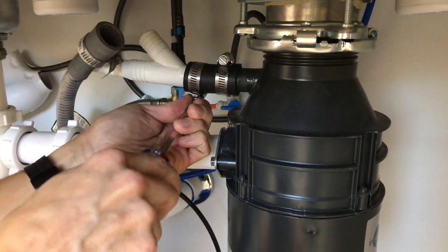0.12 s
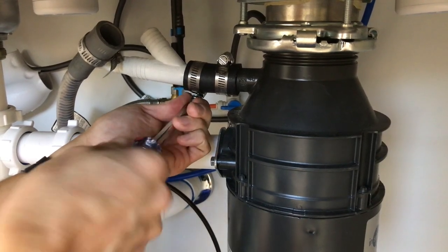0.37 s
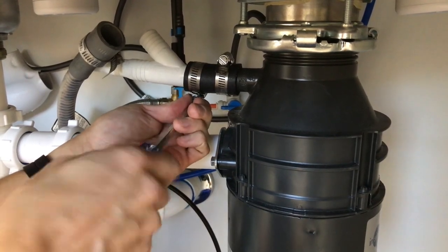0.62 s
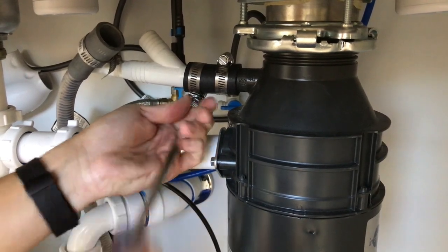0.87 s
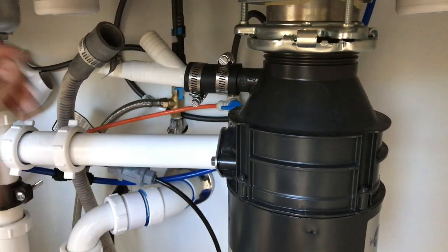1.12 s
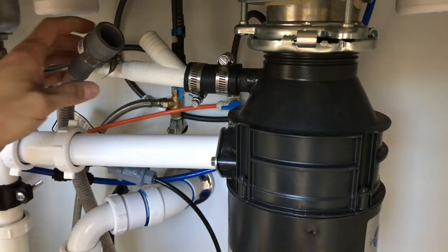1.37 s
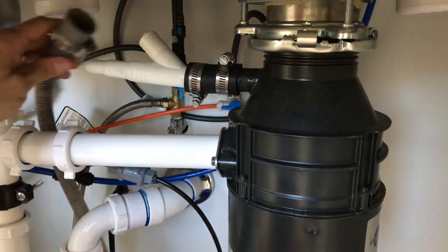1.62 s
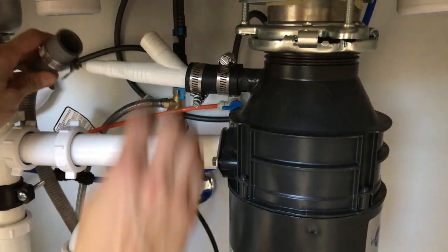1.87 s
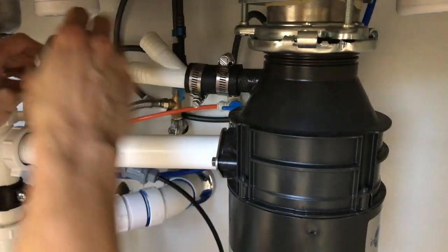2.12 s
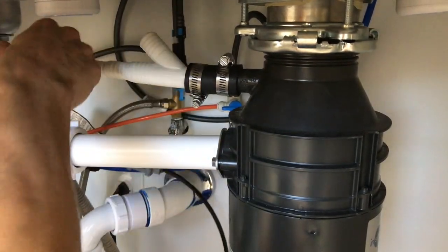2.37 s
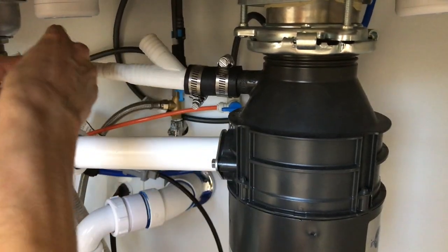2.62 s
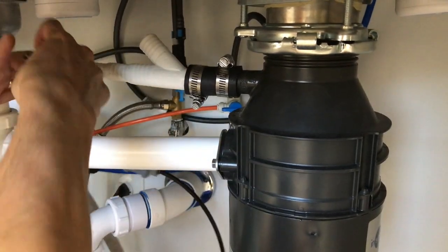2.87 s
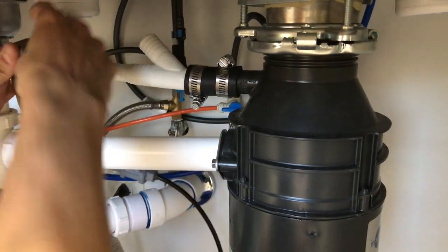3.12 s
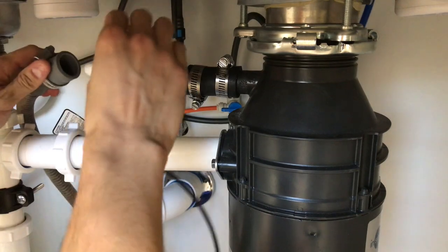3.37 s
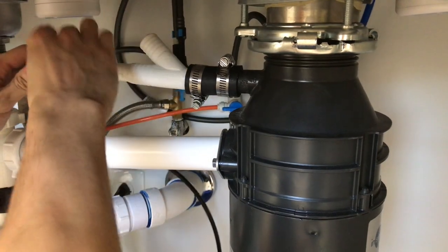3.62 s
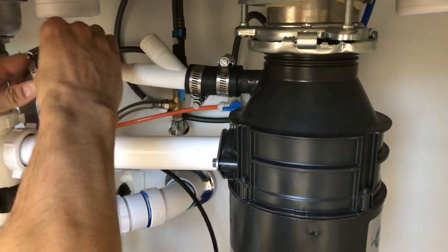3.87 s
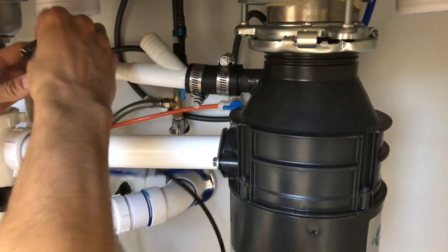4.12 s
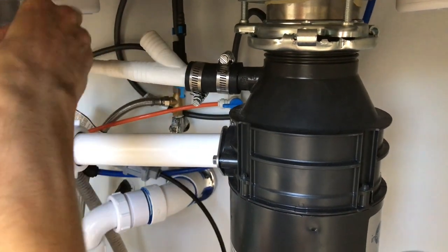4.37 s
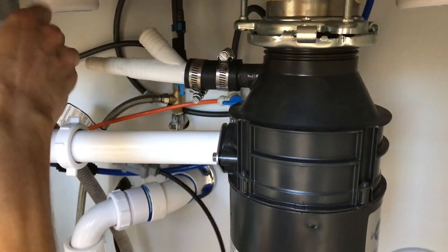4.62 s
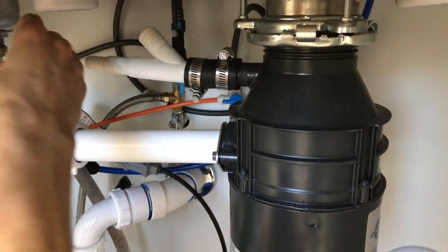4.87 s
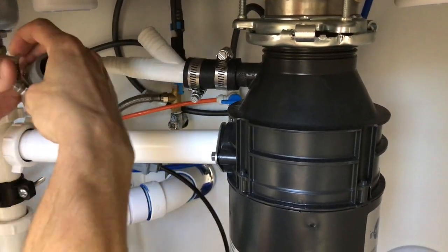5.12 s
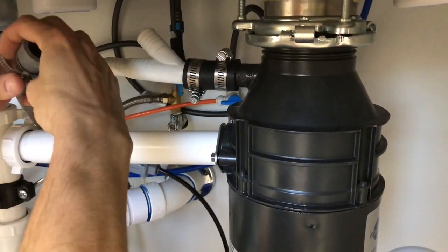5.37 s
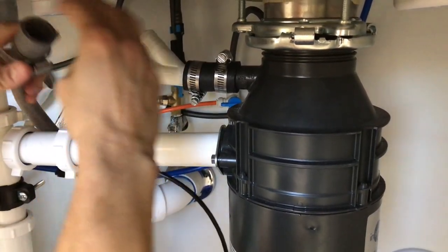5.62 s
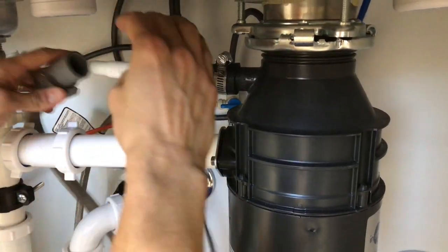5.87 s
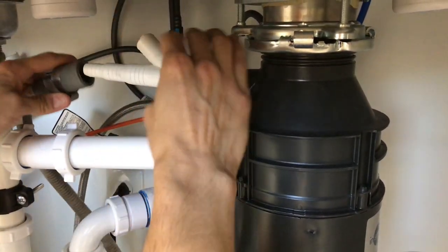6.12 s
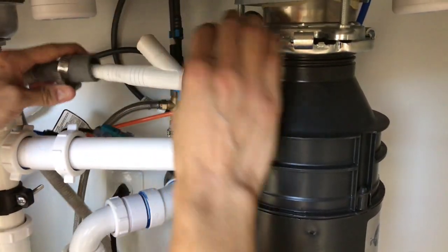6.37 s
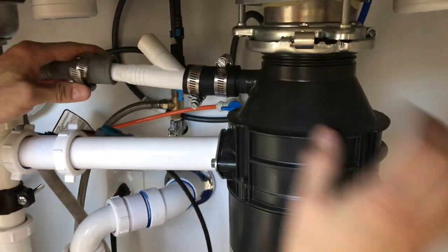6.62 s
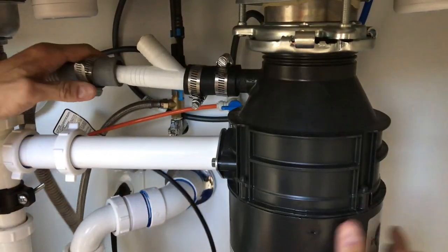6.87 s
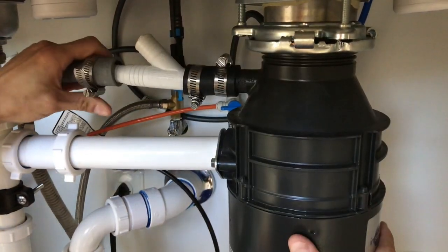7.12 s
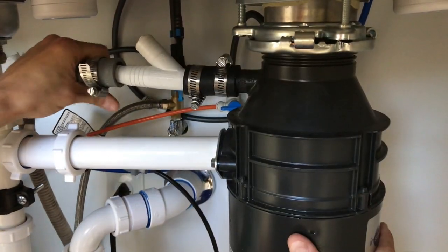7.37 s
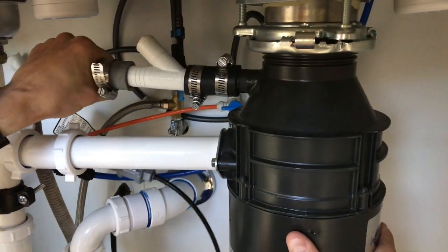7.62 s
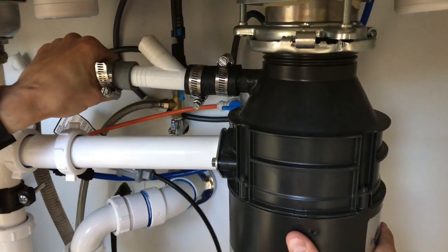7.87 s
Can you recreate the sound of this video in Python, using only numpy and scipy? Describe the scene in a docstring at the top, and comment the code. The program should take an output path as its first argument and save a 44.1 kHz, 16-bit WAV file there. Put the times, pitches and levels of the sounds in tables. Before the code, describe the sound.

A steady, soft low hum and barely audible hiss fill a small, boxy sink cabinet, miked close. At 0 s a screwdriver slips on a hose clamp with a crisp click, followed by faint rubbing and thin, fuzzy metal whistles until 0.7 s, with a dull knock near 0.55. It is almost quiet from 1 to 1.7 s. Around 1.75-1.95 a rapid cluster of hollow plastic knocks thumps the pipes, then light scrapes. Separate knocks fall near 3.0, 3.4, 4.3 and 4.6 s, with a tiny squeak near 4.8. From 5.2 s handling thickens: rubber rasps, small creaks around 5.5-5.7, then dense clatter and low thuds from 5.85 to 6.3. The loudest hard clack lands at 6.5, with a brief rubbery scrape after. Sparse clicks follow at 6.9, 7.13 with a short creak, and 7.7.

```python
"""Hands work inside a sink cabinet, over a low household hum that lasts throughout.
First a screwdriver slips on a hose clamp; then a ribbed plastic hose and its adapter are dragged over
the drain pipes. Each contact is a decaying burst of noise filtered by the plastic; pushes and knocks
excite the modes of pipes and cabinet; skin and ribs rub as grainy noise; rubber rasps and the rubbed
hose creaks as filtered pulse trains, and thin metal sings as noise in a gliding narrow band."""
import sys
import numpy as np
from scipy import signal
from scipy.fft import rfft, irfft
from scipy.io import wavfile
from scipy.ndimage import uniform_filter1d

SR = 44100
rng = np.random.default_rng(int(sys.argv[2]) if len(sys.argv) > 2 else 0)


def voltage_ratio(decibels):
    """Convert decibels (scalar or array-like) to amplitude ratios, 20 dB per decade."""
    exponent = np.asarray(decibels, float) / 20
    return 10 ** exponent


def wav_record(signal):
    """Record a signal, one row per channel, as 16-bit PCM in the file named by sys.argv[1]."""
    frames = np.transpose(np.atleast_2d(signal))
    bounded = np.clip(frames, -1, 1)
    # unit amplitude maps onto the largest positive 16-bit level
    quanta = np.round(bounded * 32767).astype(np.int16)
    wavfile.write(sys.argv[1], SR, quanta)


N = 352800  # samples


def evened(x):
    """Normalization: scales a signal to rms 1."""
    return x / np.sqrt(np.mean(x ** 2) + 1e-20)


def read(points, hz):
    """Interpolation of a spectrum on a log-frequency axis."""
    f, value = np.transpose(points)
    return np.interp(np.log(hz + 1), np.log(f + 1), value)


def add(mix, s, sound):
    """Superposition: adds a sound into the mix at a time in seconds."""
    part = mix[round(s * SR):][:len(sound)]
    part += sound[:len(part)]


def coloured(x, gain):
    """Linear filtering: multiplies the spectrum by a gain given as a function of frequency."""
    return irfft(rfft(x) * gain(np.fft.rfftfreq(x.shape[-1], 1 / SR)), x.shape[-1])


def ring(modes):
    """Modal superposition: impulse response of exponentially dying modes, peak 1."""
    t = np.arange(SR) / SR
    out = sum(voltage_ratio(db - 60 * t / t60) * np.sin(2 * np.pi * hz * t) for hz, db, t60 in modes)
    return out / abs(out).max()


def peak(hz, centre_hz, width_hz):
    """Resonance: gain of one damped mode, never narrower than 20 Hz."""
    return 1 / np.sqrt(1 + (2 * (hz - centre_hz) / max(width_hz, 20)) ** 2)


# Steady low hum. Each row: frequency in Hz, relative spectral level in dB per Hz.
HUM_SPECTRUM = [(15, -44), (25, -19.5), (40, -3), (68, 1), (97, -6.5), (152, -22.5), (183, -10.5),
                (269, -28), (372, -17), (396, -33.5), (507, -38.5), (1000, -54.5), (1300, -88),
                (2200, -120)]
# Faint hiss. Each row: frequency in Hz, relative spectral level in dB per Hz.
HISS_SPECTRUM = [(530, -46.5), (900, -9), (1060, -10.5), (1260, -4.5), (1510, -9), (5440, -10),
                 (15800, -18)]
HUM_DB, HISS_DB = -52.5, -83  # rms levels


def hum():
    """Stationary filtered noise: a steady low rumble of the house and a faint hiss."""
    low, high = rng.standard_normal((2, N))
    rumble = evened(coloured(low, lambda hz: voltage_ratio(read(HUM_SPECTRUM, hz))))
    hiss = evened(coloured(high, lambda hz: voltage_ratio(read(HISS_SPECTRUM, hz))))
    return voltage_ratio(HUM_DB) * rumble + voltage_ratio(HISS_DB) * hiss


# Hands shifting things. Each row: time in seconds, relative push on pipes and cabinet in dB,
# relative slide of skin and ribs in dB.
HAND_MOTION = [(0.0, -49, -69), (0.36, -57, -74), (0.73, -51, -79), (0.96, -54.5, -84.5),
               (1.54, -55.5, -78.5), (1.8, -47, -66), (1.91, -48.5, -65), (2.16, -43.5, -73.5),
               (2.47, -54.5, -76), (2.85, -53.5, -71), (3.39, -46.5, -71), (3.5, -44, -75),
               (3.74, -50.5, -72), (3.94, -56.5, -93), (4.17, -51, -75), (4.5, -46, -65.5),
               (5.03, -51.5, -76), (5.26, -44, -70), (5.39, -48, -70), (5.68, -51, -72), (5.81, -36.5, -69),
               (5.97, -36, -57.5), (6.24, -45, -68), (6.55, -40.5, -53.5), (6.66, -42, -69),
               (6.97, -51.5, -72.5), (7.46, -53.5, -81.5), (8.0, -47.5, -76.5)]


def hands(t):
    """Slowly varying excitation: push and slide of the hands at times t, in dB."""
    s, push_db, slide_db = np.transpose(HAND_MOTION)
    return np.interp(t, s, push_db), np.interp(t, s, slide_db)


# Modes of the drain pipes. Each row: frequency in Hz, relative level in dB, free decay time t60 in seconds.
PIPE_MODES = [(118.9, 0, 0.67), (187.1, -5, 0.44), (232.6, -2.5, 0.24), (253.1, -0.5, 0.2),
              (291.1, 0, 0.27), (315, 2.5, 0.24), (358, -10.5, 1), (413, -16.5, .7), (539, -26.5, 0.81),
              (562, -11.5, 0.21), (653.4, -15.5, .25), (710, -23, 0.19), (902, -35, 0.1)]
# Modes of the cabinet. Each row: frequency in Hz, relative level in dB, decay time t60 in seconds.
CABINET_MODES = [(66.3, 0.5, 0.28), (78.7, -9.5, 0.37), (100.7, -3.5, 0.11)]
CABINET_SHARE, PIPE_SHARE = 1, 1.73  # dB of shaking per dB of push
PUSH_REF_DB, CABINET_SHAKE_DB, PIPE_SHAKE_DB = -51, -55.5, -61.5  # shaking levels at the reference push
PUSH_LUMP_DB = 3.5  # the push comes in uneven bumps


def pushing():
    """Forced vibration: the lumpy push of the hands drives the modes of pipes and cabinet."""
    push_db = hands(np.arange(N) / SR)[0] - PUSH_REF_DB
    held = ring([(hz, db, min(t60, .3)) for hz, db, t60 in PIPE_MODES])  # a grip damps the pipes
    cabinet = ring(CABINET_MODES)
    noise, lumps = rng.standard_normal((2, 2, N))
    push = evened(noise * voltage_ratio(PUSH_LUMP_DB * evened(uniform_filter1d(lumps, 1500))))
    pipe_force = push[0] * voltage_ratio(PIPE_SHAKE_DB + PIPE_SHARE * push_db)
    cabinet_force = push[1] * voltage_ratio(CABINET_SHAKE_DB + CABINET_SHARE * push_db)
    pipe_shake = signal.oaconvolve(pipe_force, held / np.linalg.norm(held))[:N]
    cabinet_shake = signal.oaconvolve(cabinet_force, cabinet / np.linalg.norm(cabinet))[:N]
    return pipe_shake + cabinet_shake


# Resonances of hose, adapter and clamp. Each row: frequency in Hz, width in Hz (20 at least), gain in dB.
PLASTIC_MODES = [(760, 39, -7), (1080, 17, -40.5), (1320, 15, 2.5), (1297, 17, -18), (1700, 48, -17),
                 (1780, 36, 1), (2030, 20, -7), (2354, 36, -2.5), (3260, 410, -6.5), (4110, 110, -5),
                 (4840, 280, -11.5), (5900, 8.3, -0.5), (5650, 21, -6), (13460, 4000, 0.5)]


def plastic(hz):
    """Resonant transmission: gain of hose, adapter and clamp over a flat base."""
    return voltage_ratio(-3.0) + sum(voltage_ratio(db) * peak(hz, f, width) for f, width, db in PLASTIC_MODES)


# Sliding friction. Each row: frequency in Hz, relative spectral level in dB per Hz.
RUB_SPECTRUM = [(290, -26.5), (500, -5), (569, 0.5), (982, -18), (1820, -10), (2430, -14), (3850, -19.5),
                (15500, -45)]
RUB_DB = -5.5  # added to the slide of the hands


def rubbing():
    """Sliding friction: skin and ribs give grainy noise, heard through the plastic."""
    noise, grain = rng.standard_normal((2, N))
    drive = noise * voltage_ratio(5.1 * evened(uniform_filter1d(grain, 300)))
    broad = evened(coloured(drive, lambda hz: voltage_ratio(read(RUB_SPECTRUM, hz)) * plastic(hz) ** 0.98))
    slide_db = hands(np.arange(N) / SR)[1]
    return voltage_ratio(slide_db + RUB_DB) * broad


# Knocks carried into the pipes. Each row: start in seconds, peak in dB in the pipes,
# level in dB of the cabinet boom, frequency in Hz of the pipe struck.
PIPE_KNOCKS = [(0.004, -43.5, -50, 330), (0.041, -42.5, -46, 348), (0.533, -39, -60, 347),
               (0.55, -33.5, -27.5, 263), (0.705, -45, -53, 257), (0.809, -46.5, -47, 370.5),
               (1.761, -41, -61, 389), (1.805, -32.5, -47, 243), (1.847, -29, -46, 151.5),
               (1.889, -29.5, -24.5, 278), (1.928, -33, -37, 295), (2.101, -45, -65, 300.5),
               (2.298, -44, -52, 351), (3.031, -30.5, -40, 285), (3.324, -46, -52, 205),
               (3.391, -26.5, -45, 305.5), (3.461, -37, -59, 300), (3.586, -45.5, -38, 145),
               (3.86, -43, -43, 220), (4.261, -33, -58, 215.4), (4.308, -28, -46, 307.7),
               (4.349, -30.5, -36.5, 306.8), (4.625, -29, -38, 187.5), (4.776, -48, -53, 308),
               (5.007, -47, -66, 315), (5.259, -34.5, -34.5, 324.5), (5.328, -40, -38, 346),
               (5.77, -42.5, -35.5, 315), (5.848, -30.5, -48, 292), (5.919, -30.5, -28, 304.5),
               (5.977, -35, -36, 228), (6.021, -25, -30.5, 306.5), (6.108, -34, -43, 302.7),
               (6.183, -35.5, -50, 315), (6.224, -35.5, -33.5, 218), (6.29, -39, -42, 325.4),
               (6.42, -33, -28, 159), (6.442, -31, -26, 363.7), (6.517, -28.5, -29, 181),
               (6.772, -44, -39.5, 147.6), (6.949, -45.5, -51, 218), (7.138, -37.5, -48, 420),
               (7.372, -47, -42.5, 326), (7.688, -39.5, -45, 185.6), (7.727, -38, -28, 301)]
FAR_PIPE_DB_PER_OCTAVE = -1.5  # offset to the loss with distance in pitch from the struck pipe


def knocks():
    """Impulsive excitation: each knock sets the pipe modes ringing and the largest panel booming."""
    out = np.zeros(N)
    u = np.arange(2000) / SR
    soft = 1 - np.exp(-np.arange(SR) / SR / 0.0024)  # the bass takes a moment to build
    boom = ring(CABINET_MODES[:1]) * soft
    for at, knock_db, boom_db, struck_hz in PIPE_KNOCKS:
        jolt = rng.standard_normal(len(u)) * np.exp(-u / 0.02)  # a knock is a short scrub
        modes = []
        for hz, db, t60 in PIPE_MODES:
            # long-ringing pipes answer only when struck near their own note
            slope_db = FAR_PIPE_DB_PER_OCTAVE + 22 * t60
            modes.append((hz, db - slope_db * abs(np.log2(hz / struck_hz)), t60))
        pipes = signal.oaconvolve(jolt, ring(modes))[:SR]
        own_note = soft * ring([(struck_hz, 0, .3)])  # the spot hit gives its own note
        knock = pipes / abs(pipes).max() + 0.61 * own_note
        add(out, at, voltage_ratio(knock_db) * knock / abs(knock).max())
        add(out, at, voltage_ratio(boom_db) * boom)
    return out


BRUSHES_PER_S, BRUSH_T60 = 3, .075  # decay time in seconds
BRUSH_DB, BRUSH_EDGE_DB, BRUSH_TICK_DB = 17, -11, -27  # body above the slide; edge and tick re the body


def brushes():
    """Random excitation: faint chance contacts, one per equal time slot, stronger as the hands slide."""
    count = round(BRUSHES_PER_S * N / SR)
    place, size = rng.random((count, 2)).T
    s = (np.arange(count) + place) / BRUSHES_PER_S
    body_db = np.minimum(hands(s)[1] + BRUSH_DB, -57) - 8 * size
    return [(at, db, db + BRUSH_EDGE_DB, db + BRUSH_TICK_DB, BRUSH_T60) for at, db in zip(s, body_db)]


# Contacts. Each row: start in seconds, relative levels in dB of the hollow body, of the hard edge and
# of the bright tick, decay time t60 in seconds of the dull part.
CONTACTS = [(0.01, -25, -23.5, -48, 0.033), (0.045, -42, -50, -60, 0.036), (0.138, -32, -41.5, -63, 0.032),
            (0.186, -74, -53, -59, 0.046), (0.211, -57, -61, -82, 0.15), (0.332, -73, -54, -67.5, 0.053),
            (0.528, -41, -49, -62, 0.13), (0.544, -57, -43, -72, 0.05), (0.711, -55.5, -63, -91, 0.048),
            (0.801, -44, -56.5, -83, 0.062), (0.829, -50.5, -44, -70.5, 0.032),
            (1.012, -67, -59, -77, 0.079), (1.027, -57.5, -51, -70, 0.035),
            (1.755, -26, -36.5, -49.5, 0.052), (1.796, -35, -46, -65, 0.083),
            (1.807, -30, -39.5, -50, 0.035), (1.848, -31, -40, -54.5, 0.059),
            (1.876, -36, -43.5, -58, 0.15), (1.89, -42, -45.5, -56, 0.065), (1.919, -31, -43, -79, 0.047),
            (1.94, -38.5, -43.5, -47.5, 0.13), (2.143, -48.5, -60.5, -71, 0.17),
            (2.174, -48, -69, -79, 0.13), (2.226, -46.5, -61, -87, 0.052), (2.242, -43.5, -68, -86, 0.044),
            (2.297, -51.5, -62, -96, 0.029), (2.357, -56, -67, -83, 0.095), (2.46, -57, -66, -86, 0.1),
            (2.659, -42, -99, -87, 0.044), (2.805, -48, -55.5, -75, 0.052), (3, -50, -63, -68, 0.11),
            (3.016, -33, -44, -53.5, 0.063), (3.046, -29.5, -42, -50.5, 0.083),
            (3.321, -44, -55.5, -81, 0.066), (3.38, -37.5, -49, -64, 0.18), (3.39, -39.5, -51, -81, 0.065),
            (3.45, -37.5, -47, -57.5, 0.073), (3.583, -33, -57.5, -72, 0.13), (3.772, -38, -61, -83, 0.051),
            (3.836, -48.5, -64, -70, 0.052), (3.87, -43.5, -50, -64, 0.097), (3.91, -53, -63, -79, 0.061),
            (3.944, -51, -67, -84, 0.07), (4.252, -36, -46, -64, 0.082), (4.295, -31.5, -43, -52, 0.073),
            (4.329, -49, -57, -73, 0.14), (4.341, -40, -47.5, -66, 0.091), (4.389, -45, -60.5, -72, 0.093),
            (4.613, -27, -43.5, -54, 0.085), (4.623, -48, -34, -47, 0.066), (4.65, -45.5, -56, -67, 0.23),
            (4.754, -55.5, -62.5, -64.5, 0.12), (4.833, -45, -57, -96, 0.12),
            (4.918, -48.5, -101, -92, 0.042), (5.233, -41.5, -48, -59.5, 0.2),
            (5.256, -30.5, -38.5, -61, 0.058), (5.324, -47, -63, -82, 0.091),
            (5.474, -44, -51, -60.5, 0.048), (5.506, -61, -49.5, -80, 0.09),
            (5.707, -53, -61.5, -74, 0.068), (5.755, -56, -61.5, -73, 0.072),
            (5.864, -40.5, -48, -58, 0.073), (5.887, -36, -48, -56, 0.064),
            (5.919, -26.5, -35.5, -45.5, 0.039), (5.957, -28, -40, -59, 0.048),
            (6.003, -30.5, -41.5, -56, 0.12), (6.018, -45, -39, -59.5, 0.11),
            (6.087, -37, -49.5, -65, 0.15), (6.097, -46, -47.5, -55.5, 0.047), (6.184, -44, -60, -89, 0.14),
            (6.207, -38, -72, -89, 0.077), (6.29, -43.5, -56.5, -82.5, 0.054),
            (6.385, -41.5, -56, -70, 0.045), (6.413, -33.5, -43.5, -59, 0.078),
            (6.437, -25, -36.5, -50.5, 0.076), (6.452, -33, -41.5, -54.5, 0.15),
            (6.494, -42, -49.5, -51, 0.09), (6.515, -12.5, -19, -42, 0.063), (6.559, -46, -50, -61, 0.069),
            (6.658, -41, -57, -67, 0.068), (6.674, -38, -51, -67, 0.037), (6.758, -59.5, -66.5, -86, 0.056),
            (6.86, -36.5, -35.5, -40.5, 0.051), (6.944, -44, -55, -70, 0.042),
            (7.129, -31, -42.5, -56, 0.037), (7.366, -58.5, -69, -88, 0.042),
            (7.678, -39, -49, -61.5, 0.055), (7.7, -43, -54, -68, 0.11), (7.715, -33.5, -44.5, -62, 0.056)]
SOFT_RING_HZ, HARD_RING_HZ = 2750, 5400  # ring at hardness 0 and 1: harder contacts ring higher
HARD_RING_DB = 2.5  # and more strongly, per unit of hardness
HARD_AT_DB, HARD_SPAN_DB = -5.5, 3.5  # edge re body at which a contact turns hard, and the spread
LOUD_FROM_DB, LOUD_HARDENS = -34, .9  # a strong blow reaches the metal clamp


def clicks():
    """Impact: each contact is a grainy burst of tiny blows whose brighter part dies sooner."""
    out, t = np.zeros(N), np.arange(8192) / SR
    for s, body_db, edge_db, tick_db, t60 in CONTACTS + brushes():
        blow_db = edge_db - body_db + LOUD_HARDENS * max(edge_db - LOUD_FROM_DB, 0)
        hard = 1 / (0.5 + np.exp((HARD_AT_DB - blow_db) / HARD_SPAN_DB))  # 0 to 2
        ring_hz = SOFT_RING_HZ * (HARD_RING_HZ / SOFT_RING_HZ) ** hard
        ring_gain = voltage_ratio(5.0 + HARD_RING_DB * hard)
        noise, grain = rng.standard_normal((2, len(t)))
        chatter = voltage_ratio(3.1 * evened(uniform_filter1d(grain, 40)))  # the contact chatters
        colour = [(350, body_db + 2), (700, body_db), (2000, body_db - 4.5),
                  (3200, edge_db - 3.0), (5500, edge_db - 1.5),
                  (8500, tick_db + 4.5), (15000, tick_db - 5 + 0.34 * (tick_db - edge_db))]
        burst = coloured(noise * chatter, lambda hz: voltage_ratio(read(colour, hz))
                         * (plastic(hz) + ring_gain * peak(hz, ring_hz, 660)))
        dull = coloured(burst, lambda hz: 1 / (1 + (hz / 3500) ** 2))
        bright = burst - dull
        rise = 1 - np.exp(-t / (0.027 * t60))  # a dragged contact starts more softly
        add(out, s, rise * (dull * voltage_ratio(-60 * t / t60) + bright * voltage_ratio(-60 * t / (0.55 * t60))))
    return voltage_ratio(-1.5) * out


# Rubber rasping along a pipe. Each row: start in seconds, end in seconds, rms level in dB,
# frequency in Hz of the added resonance.
RUBBER_RASPS = [(0.14, 0.29, -81, 4700), (0.358, 0.525, -86, 4430), (1.387, 1.814, -81.5, 690),
                (4.429, 4.445, -93, 2300), (4.823, 4.87, -67.5, 3540), (5.399, 5.48, -66.5, 3420),
                (5.502, 5.58, -72.5, 3450), (5.773, 5.935, -62.5, 1810), (6.471, 6.5, -64.5, 1990),
                (6.579, 6.69, -68.5, 5100), (7.149, 7.192, -60.5, 3450), (7.332, 7.346, -76.5, 2500),
                (7.623, 7.704, -75, 2740)]
# Short pitched creaks of the rubbed hose, with evenly stacked partials. Each row: start in seconds,
# end in seconds, rms level in dB, frequency in Hz of the added resonance, pulses per second.
HOSE_CREAKS = [(2.363, 2.391, -69.5, 2340, 262), (5.511, 5.605, -76.5, 2300, 256),
               (5.65, 5.679, -65, 2330, 258), (7.172, 7.197, -58.5, 980, 484)]
RASP_PER_S, RASP_GRIT, CREAK_GRIT = 1400, 0.76, .15  # pulses per second; grit 0 is clean, 1 is noisy
CREAK_TOP = 12  # the cleaner the train, the more it fades above this multiple of its rate


def rasps_and_creaks():
    """Pulse-train excitation: even pulses give stacked partials, gritty ones rasp; louder is brighter."""
    out = np.zeros(N)
    strokes = [(*row, RASP_PER_S, RASP_GRIT) for row in RUBBER_RASPS]
    strokes += [(*row, CREAK_GRIT) for row in HOSE_CREAKS]
    for start, end, db, ring_hz, per_s, grit in strokes:
        spacing, strength, noise = rng.standard_normal((3, SR // 2))
        size = round((end - start) * SR)
        progress = np.arange(SR // 2) / (per_s * (end - start))
        speed_up = 1 + 0.023 * (progress - .5)  # the pulses quicken a little
        gaps = np.exp(0.055 * grit ** 2 * spacing) * SR / per_s / speed_up
        at = np.cumsum(gaps).astype(int) - round(.9 * SR / per_s)
        train = np.zeros(SR // 2)
        np.add.at(train, np.abs(at[at < size]), voltage_ratio(2.3 * grit * strength[at < size]))
        # each pulse also leaves a puff of noise with a time constant of 7.6 ms
        puffs = noise * signal.lfilter([1], [1, -np.exp(-1 / (0.0076 * SR))], train)
        u = np.arange(SR // 2) / size
        stroke = np.clip(u / 0.19, 0, 1) * np.clip(1 - u, 0, 1) ** 0.46  # quick rise, slow fall
        drive = stroke * ((1 - grit) * evened(train) + grit * evened(puffs))
        base = [(300, -30.5), (500, -8.5), (5500, -8), (6500, 0.85 * (db + 50)), (15000, 1.1 * (db + 39.5))]

        def gain(hz):
            fade = 1 + (1 - grit) * (hz / (CREAK_TOP * per_s)) ** 4
            return (voltage_ratio(read(base, hz)) + peak(hz, ring_hz, 600) ** 2) * plastic(hz) ** 2 / fade

        rasp = coloured(drive, gain)
        add(out, start, voltage_ratio(db) * rasp / np.std(rasp[:size]))
    return out


# Thin metal singing while it is rubbed. Each row: start in seconds, end in seconds,
# level in dB (rms before the fades), frequency in Hz at the start, frequency in Hz at the end.
METAL_SINGING = [(0.224, 0.32, -77, 1820, 1710), (0.207, 0.273, -79, 4260, 4180),
                 (0.324, 0.556, -78, 1417, 1243), (.38, 0.488, -87, 4000, 3880),
                 (0.59, 0.7, -82, 1320, 1270), (4.766, 4.786, -65.5, 2720, 2690),
                 (6.573, 6.648, -67, 5240, 4930), (7.873, 7.93, -82, 1267, 1270)]


def singing():
    """Narrow-band modulation: smoothed noise on a gliding carrier gives a fuzzy, broken whistle."""
    out = np.zeros(N)
    for start, end, db, from_hz, to_hz in METAL_SINGING:
        a, b, grip = rng.standard_normal((3, SR // 2))
        size = round((end - start) * SR)
        fuzz = uniform_filter1d(a, 450) + 1j * uniform_filter1d(b, 450)
        fuzz = fuzz * voltage_ratio(1.7 * evened(uniform_filter1d(grip, 900)))
        phase = 2 * np.pi * np.cumsum(np.linspace(from_hz, to_hz, size)) / SR
        tone = (fuzz[:size] * np.exp(1j * phase)).real
        add(out, start, voltage_ratio(db) * evened(tone) * signal.windows.tukey(size, .6))
    return out


# Reverberation of the cabinet. Each row: frequency in Hz, decay time t60 in seconds.
CABINET_TAIL = [(500, 0.43), (2000, 0.094), (6000, 0.1), (14000, 0.091)]


def echo(x):
    """Reverberation: the closed cabinet answers with a short dense tail of decaying noise."""
    hz, t, z = signal.stft(rng.standard_normal(SR // 2), SR, nperseg=256)
    decay = voltage_ratio(-60 * t / read(CABINET_TAIL, hz)[:, None])
    tail = signal.istft(z * decay, SR, nperseg=256)[1]
    return signal.oaconvolve(x, tail / np.linalg.norm(tail))[:N]


def scene():
    """Superposition: all sources in the cabinet, with the near ones echoed."""
    near = clicks() + rubbing() + rasps_and_creaks() + singing()
    return (near + voltage_ratio(-10.5) * echo(near) + pushing() + knocks() + hum())[None]


def top_cut(x):
    """Nothing passes above the cut-off."""
    return signal.sosfilt(signal.butter(12, 16360, fs=SR, output="sos"), x)


def record(dry):
    """High-pass response: the microphone drops the deepest bass."""
    low_cut = signal.butter(N=6, Wn=49, btype="high", fs=SR, output="sos")
    mix = signal.sosfilt(low_cut, dry)
    return top_cut(mix)


dry = scene()
out = record(dry)
wav_record(out)
```